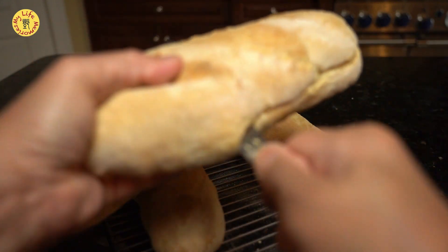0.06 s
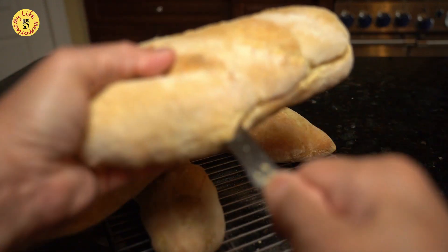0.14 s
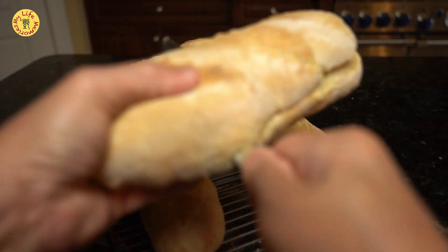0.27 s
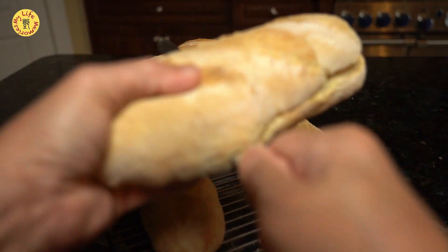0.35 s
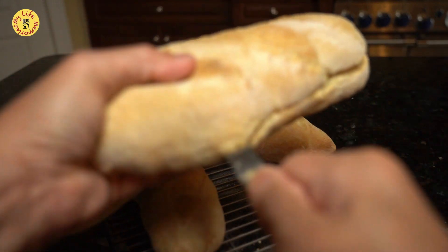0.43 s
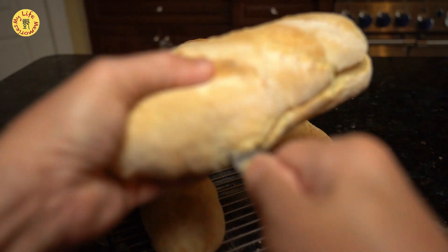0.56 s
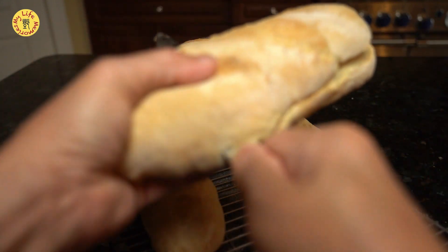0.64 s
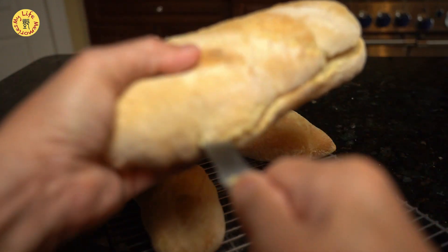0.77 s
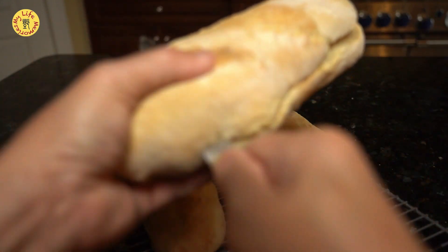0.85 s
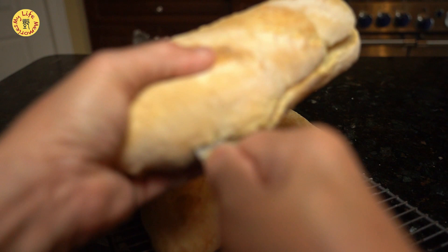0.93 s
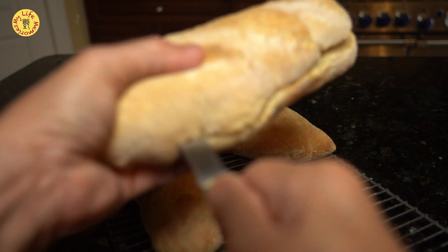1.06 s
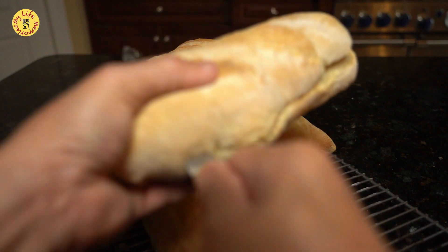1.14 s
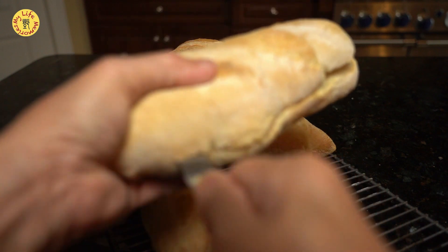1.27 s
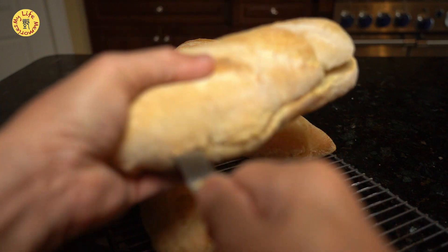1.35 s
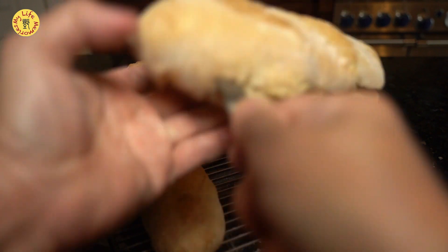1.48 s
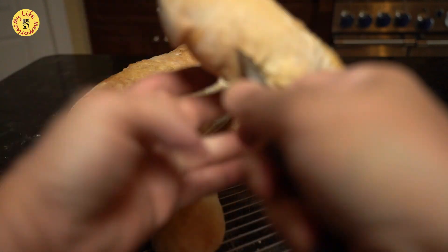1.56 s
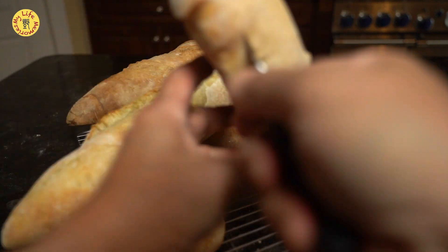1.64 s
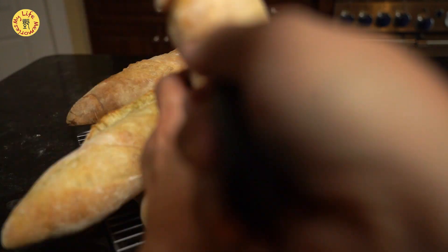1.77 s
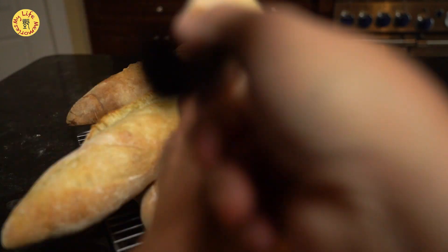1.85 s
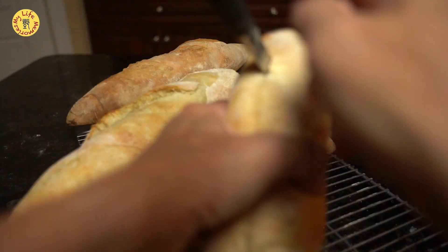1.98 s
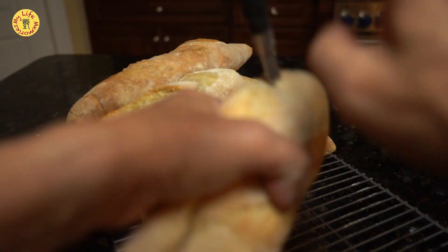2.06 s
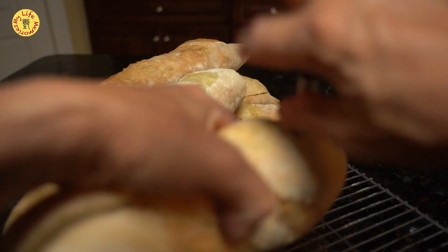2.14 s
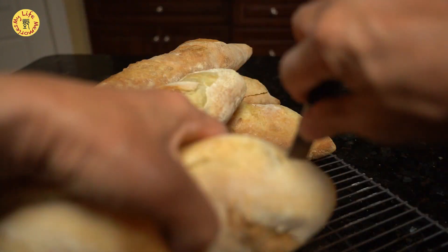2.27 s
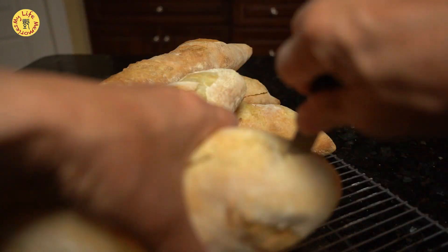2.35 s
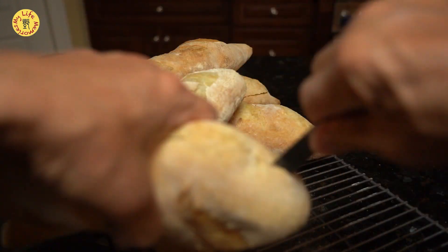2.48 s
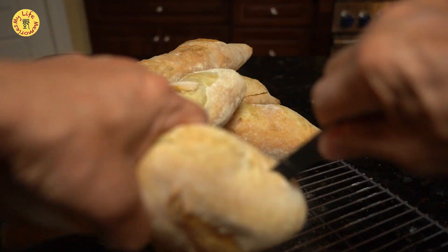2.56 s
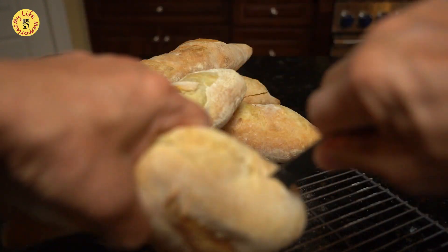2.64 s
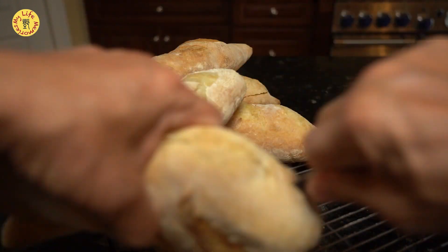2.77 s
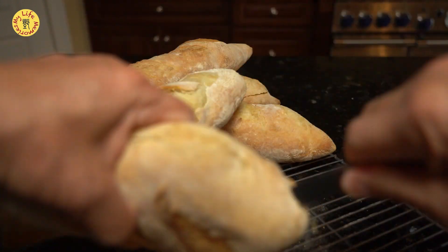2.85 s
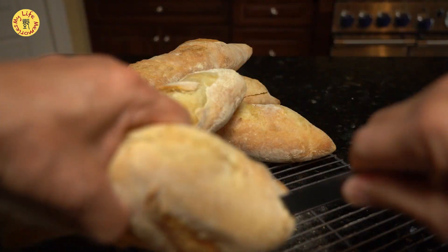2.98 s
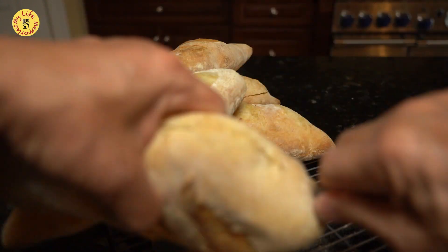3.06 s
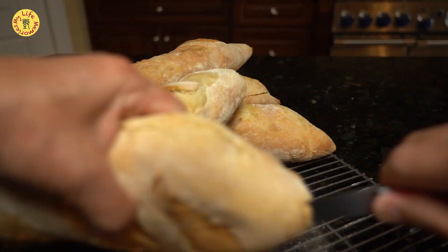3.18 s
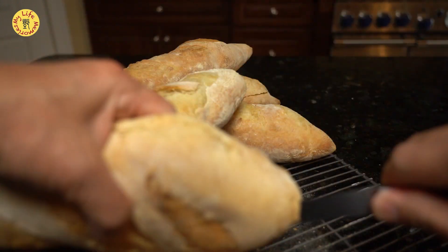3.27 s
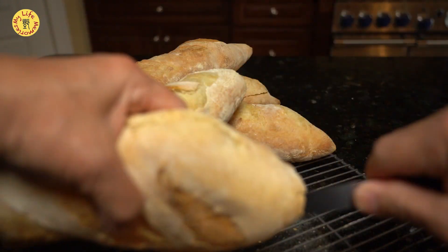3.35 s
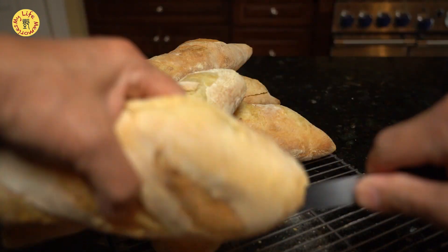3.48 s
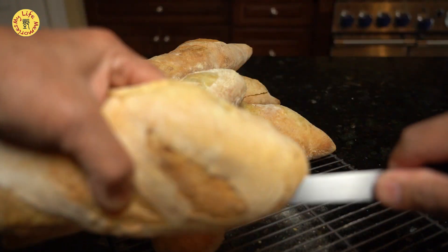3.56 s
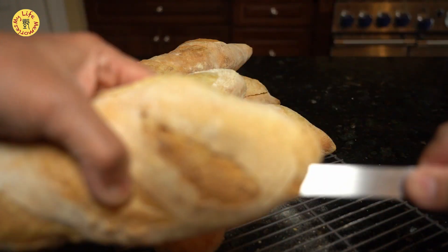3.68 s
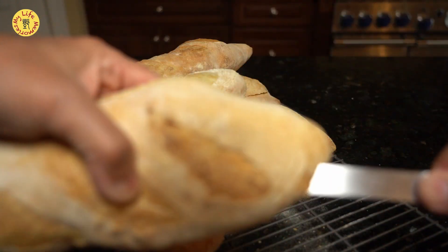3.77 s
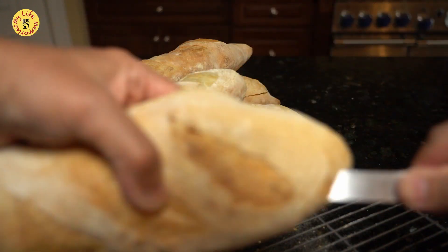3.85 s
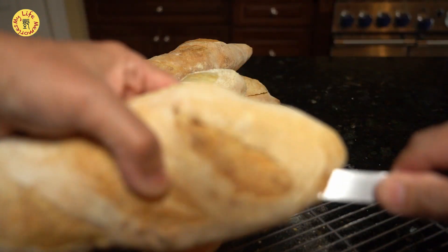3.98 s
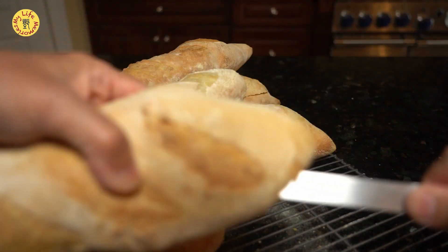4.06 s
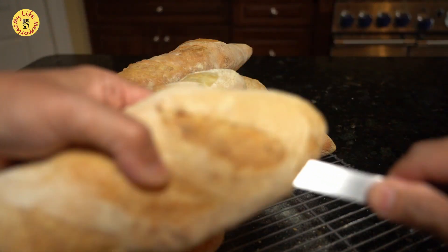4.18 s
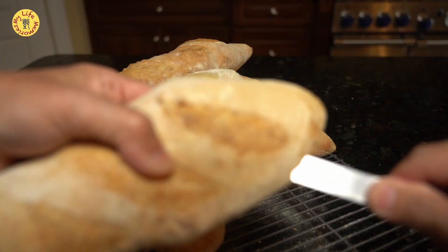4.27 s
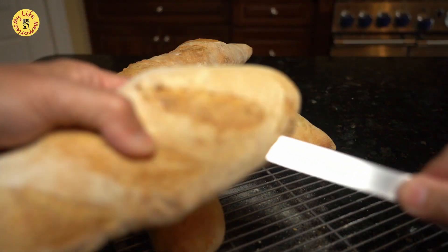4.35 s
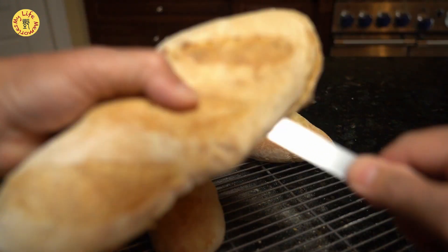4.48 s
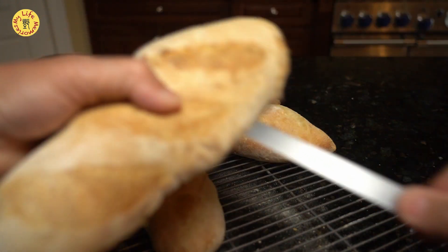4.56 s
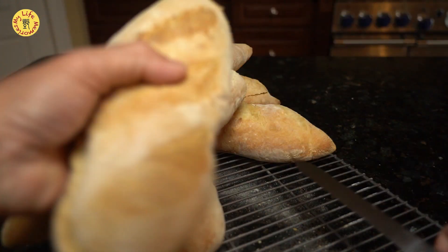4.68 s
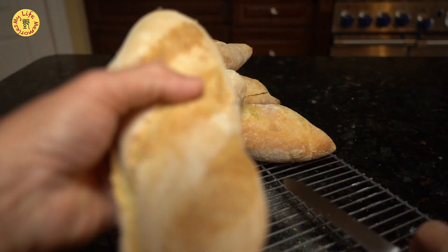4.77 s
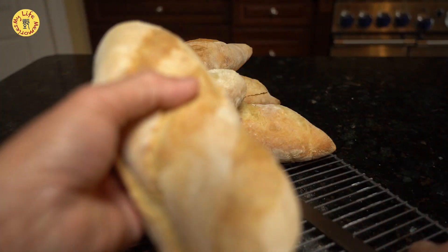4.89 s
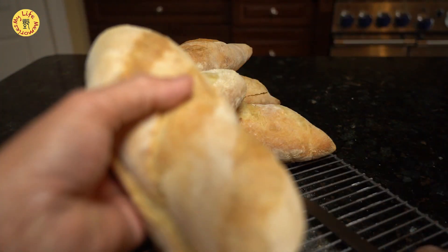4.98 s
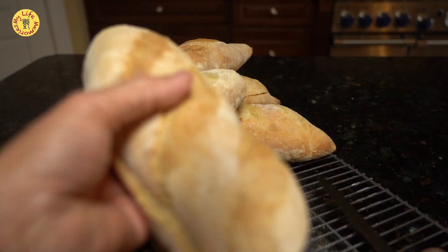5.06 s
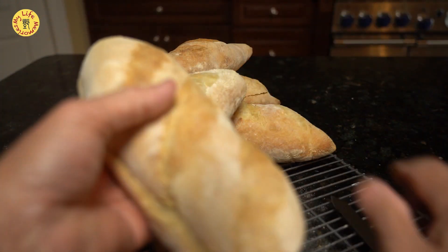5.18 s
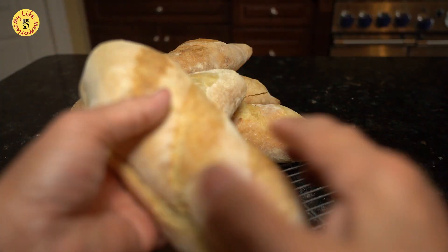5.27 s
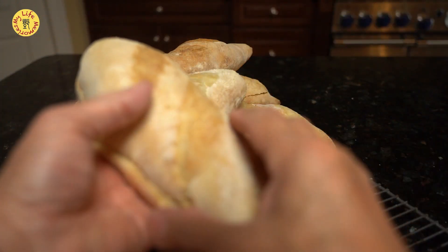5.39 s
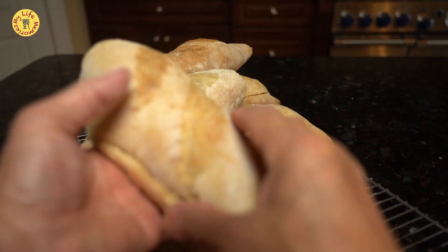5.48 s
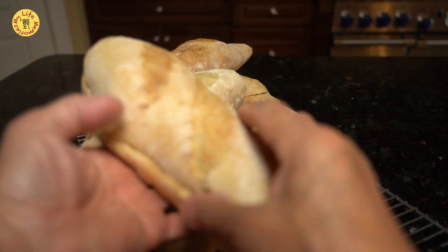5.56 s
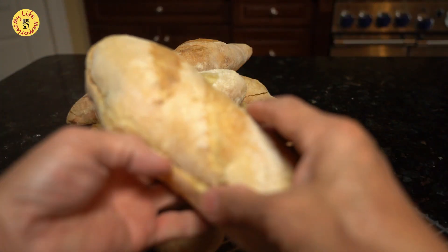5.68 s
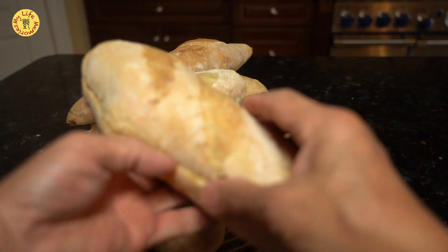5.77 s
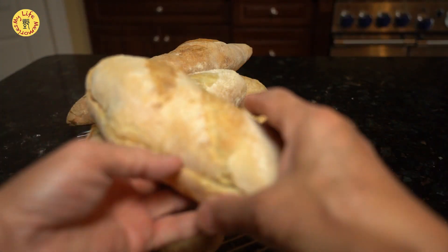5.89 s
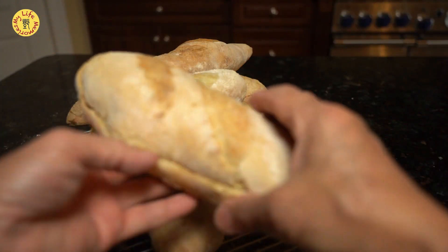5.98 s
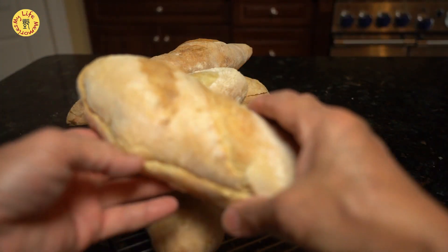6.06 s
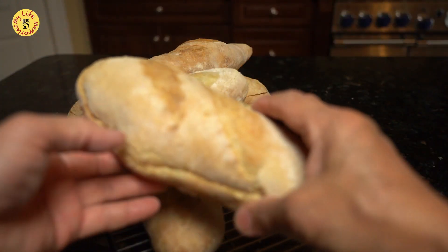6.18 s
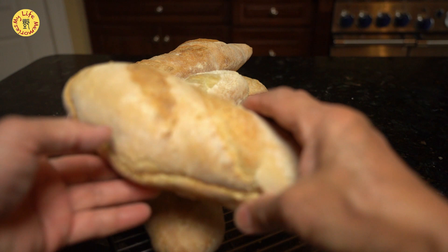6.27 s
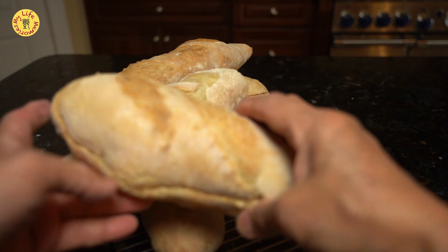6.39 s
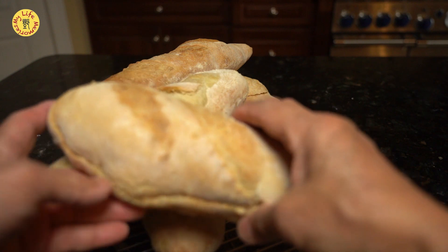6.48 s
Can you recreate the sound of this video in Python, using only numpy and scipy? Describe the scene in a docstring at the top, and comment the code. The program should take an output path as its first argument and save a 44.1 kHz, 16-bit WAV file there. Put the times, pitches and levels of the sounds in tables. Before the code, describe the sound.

A crusty loaf is cut close to a stereo pair of microphones in a quiet kitchen with short reflections. From 0 to 1.3 seconds, quick irregular sawing strokes tear the crust, with sharp dry snaps and soft hollow thuds from the loaf. Between 1.4 and 2.3 it is sparser, with a few light scrapes. From 2.4 the crackling returns, growing into dense, bright crunching from about 2.7 to 3.3. After a lull with one small snap, another short crackle comes at 4.1 to 4.5. A faint metallic touch at 4.7 leads to the knife being laid down: a light tick near 5.0, then a loud, bright, rattling clatter on the hard counter at 5.15 to 5.3. Then soft rustling, a small crusty squeeze at 6.0 and a tiny tick at 6.3. A low fan hiss and faint wavering midrange whine continue throughout.

```python
"""A knife saws through a crusty loaf between two microphones; later it is laid down with a clatter.
Strokes are clumped crackling noise; flakes snap as short noise bursts, and filtered noise gives the dull loaf.
The clatter sends noise bursts through the resonances of blade and counter; sparse taps make the reflections.
A fan hisses in the kitchen: drifting noise, narrow noise bands and two wavering tones near 1.1 kHz.
Faint low thumps are short windowed sines."""
import sys
import numpy as np
from scipy import signal
from scipy.fft import rfft, irfft
from scipy.io import wavfile
from scipy.ndimage import uniform_filter1d

SR = 44100
rng = np.random.default_rng(int(sys.argv[2]) if len(sys.argv) > 2 else 0)


def digitize_waveform(pressure):
    """Quantize a signal to 16-bit integers and store it at the path in sys.argv[1].

    Rows of a 2-D input are taken as channels; values are limited to [-1, 1].
    """
    field = np.atleast_2d(pressure).T
    bounded = np.clip(field, -1, 1)
    quanta = np.round(bounded * 32767).astype(np.int16)
    wavfile.write(sys.argv[1], SR, quanta)


N = 287956  # length in samples

# Strokes of the knife and squeezes of the hand. Each row: start in seconds, length in seconds,
# tearing level in dB before the clumping, body of the loaf over the tearing in dB.
STROKES = [(0.0, 0.034, -39, -3), (0.164, 0.033, -62.5, 11), (0.306, 0.055, -49, 2), (0.45, 0.06, -54, 8.5),
           (0.64, 0.019, -45, 3.5), (0.752, 0.052, -48.5, 2.5), (0.895, 0.033, -43, -3),
           (1.02, 0.043, -52, 6), (1.188, 0.04, -54, 10.5), (1.477, 0.034, -47.5, 1),
           (1.663, 0.12, -52, -8), (1.984, 0.063, -53, -24), (2.366, 0.016, -62, -14),
           (2.436, 0.043, -46.5, -6), (2.547, 0.025, -47, -17), (2.754, 0.11, -50, 0),
           (2.856, 0.11, -44.5, -2.5), (3.09, 0.03, -52, 8.5), (3.185, 0.079, -37.5, -4.5),
           (4.063, 0.1, -53.5, 0), (4.21, 0.077, -56.5, 11.5), (4.45, 0.014, -52.5, 11),
           (6.025, 0.054, -43, -4)]
# Flakes of crust that snap. Each row: time in seconds, crack level in dB before trim, crack pitch in Hz,
# body level against the crack in dB before trim, body pitch in Hz.
SNAPS = [(0.041, -25.5, 7670, 2.5, 1340), (0.17, -42, 4040, 18, 1760), (0.281, -31.5, 4000, 6, 2470),
         (0.31, -39, 3500, 5, 1500), (0.336, -31, 6500, 2, 1490), (0.347, -33, 4000, 4, 2000),
         (0.36, -33, 4500, -8, 2400), (0.452, -32, 3500, 8, 1830), (0.469, -36, 7040, 5, 2200),
         (0.629, -42, 4640, 11, 1290), (0.66, -37, 4000, 7, 1500), (0.681, -24, 9450, -23, 2620),
         (0.743, -31, 8520, -10, 1970), (0.776, -41.5, 4000, 15, 2050), (0.789, -40, 4000, 10, 1930),
         (0.8914, -26.5, 9310, -1.5, 1280), (0.92, -26, 6300, -3, 1670), (0.937, -30.5, 3800, 5.5, 1990),
         (1.018, -35.5, 4120, 4, 2570), (1.061, -32, 6080, -4, 1560), (1.084, -38, 5000, 14, 2020),
         (1.216, -34, 4030, 6, 1570), (1.221, -32.5, 3500, 11.5, 2750), (1.3612, -27.5, 4040, 1, 1910),
         (1.669, -34, 4820, 2, 1570), (1.994, -37, 9000, -9, 1520), (2.361, -28, 9000, -8, 3500),
         (2.3683, -23.5, 8100, -2.5, 3520), (2.377, -33, 7000, -4, 3340), (2.4166, -36, 9000, -11, 1630),
         (2.458, -34, 7000, 2, 2280), (2.472, -30, 8000, 3, 2300), (2.537, -38, 4000, 6, 1900),
         (2.5445, -28, 4000, 7.5, 900), (2.601, -35, 8500, -8, 2000), (2.7052, -21.5, 7800, -15, 1260),
         (2.7354, -21, 9300, -5, 1450), (2.772, -29.5, 4140, -5, 2500), (2.79, -37, 4000, 10, 1400),
         (2.8611, -33, 5720, 3, 2290), (2.866, -28.5, 4500, 5, 2980), (2.888, -23, 4250, -7, 3260),
         (2.904, -23.5, 8500, -6, 3300), (2.914, -27, 5960, 5, 3340), (2.92, -26, 4260, 5, 3200),
         (2.929, -33, 4260, 7, 3020), (2.943, -28, 4000, 5, 2300), (2.958, -22, 6700, -0.5, 2010),
         (2.965, -27, 4500, 3, 1100), (2.972, -28, 4970, 4, 3020), (3.1013, -35.5, 8400, 10, 1390),
         (3.1125, -30.5, 5650, 3, 1330), (3.148, -36, 4930, 11, 1270), (3.161, -26, 3300, 11, 1340),
         (3.1848, -20, 8000, -17, 1420), (3.2005, -25, 11000, -20, 1710), (3.2225, -20.5, 10500, -7, 1500),
         (3.2423, -23.5, 7200, 1, 2030), (3.254, -24, 4000, -15, 1100), (3.264, -23.5, 7000, -7, 2690),
         (3.275, -28, 4000, -4, 3160), (3.287, -28.5, 3800, 1, 1680), (3.678, -35.5, 6650, -1, 1660),
         (4.068, -32, 4340, -5, 1670), (4.1115, -23.5, 9700, -2, 1500), (4.1305, -26.5, 5000, 1, 1410),
         (4.154, -28.5, 3600, 7, 1430), (4.192, -43, 4000, 12, 1750), (4.2178, -30.5, 7150, 3, 1500),
         (4.409, -34.5, 9600, 2, 2360), (4.4473, -29, 10500, 3, 1180), (4.462, -46, 4000, 10, 1990),
         (4.4768, -32.5, 5810, 8, 3120), (4.778, -39, 9500, -8, 1900), (6.335, -31.5, 8000, -14, 1650)]
# The cut moves as the loaf is turned. Each row: time in seconds, left over right in dB.
CUT_PLACE = [(0, -3), (.65, 1), (.8, -1.5), (1.4, 3.5), (2.4, -0.5), (2.75, 1.5), (2.9, -3), (3.3, -4),
             (4.0, -0.5), (4.5, -1.5), (6.53, 4)]
# Soft bumps or squeezes of the hollow loaf. Each row: time in seconds, level in dB before trim, pitch in Hz.
BUMPS = [(0.188, -42.5, 380), (0.28, -47, 456), (0.33, -42.5, 410), (0.45, -41, 404), (0.668, -42, 930),
         (0.92, -46, 447), (1.04, -47, 890), (2.541, -44, 470), (2.623, -42, 480), (2.867, -44, 543),
         (3.087, -41, 390), (3.108, -39.5, 410), (3.161, -54, 745), (3.245, -38, 930), (4.446, -42.5, 393),
         (4.671, -42.5, 540), (6.045, -48, 460)]
# The knife touches down, lands and rattles. Each row: time in seconds, scrape level in dB before trim,
# knock against the scrape in dB before trim, knock pitch in Hz, blade ring against the scrape in dB,
# ring pitch in Hz.
CLATTER = [(4.675, -39, 0, 600, 19, 3030), (4.97, -28.5, 2, 1100, 10, 3640),
           (4.973, -22.5, 2, 1600, -3, 13400), (4.982, -33, 9, 1100, 0, 9000),
           (5.143, -13, 2, 1700, -1, 4300), (5.149, -6.5, 2.5, 1130, -16, 5800),
           (5.157, -12.5, 1, 1300, -5, 9560), (5.1633, -11.5, 7, 1000, -9, 5700),
           (5.171, -14, 11, 1200, -11, 9570), (5.1766, -19, 9, 1300, 0, 7400),
           (5.187, -23, 13, 950, 10, 3050), (5.1967, -9, -4, 1300, -4, 4900),
           (5.2024, -7, 2, 800, -1, 3020), (5.2157, -12.5, 7, 2030, 0.5, 6800),
           (5.222, -12.5, 6, 430, -14, 5700), (5.2276, -18.5, 12.5, 1180, -18, 8370),
           (5.2382, -19, 4, 1450, -2, 7470), (5.2601, -19, 6, 1100, -9, 7040),
           (5.283, -24.5, 5, 1100, -9, 7400), (5.313, -34, 16, 1300, -5, 7450)]
# Tone colour of the tearing crust. Each row: frequency in Hz, relative level in dB per Hz.
CRUST = [(1470, -22), (2500, -5), (3230, -5.5), (3550, -4), (4410, -9), (5030, -9), (5610, -7), (15200, -9),
         (16000, -4.5)]
# Tone colour of the loaf's body. Each row: frequency in Hz, relative level in dB per Hz.
LOAF = [(88, -60), (150, -26), (300, -20), (579, -8), (660, -11.5), (1200, -4.5), (1320, -4.5),
        (1570, -4.5), (3220, -10), (5000, -18), (6500, -94), (11000, -120)]
# Tone colour of the scraping blade. Each row: frequency in Hz, relative level in dB per Hz.
BLADE = [(1470, -26), (2000, 8), (2500, -6), (2740, -11), (2990, 2), (3720, -5), (5740, 1), (6200, -1),
         (8600, -5), (10100, -9.5), (15000, -8), (16000, -9)]
# Ringing modes of the blade. Each row: frequency in Hz, width in Hz, relative level in dB.
STEEL = [(3042, 50, 2), (3800, 90, -4), (4230, 90, -4), (5000, 90, -5), (5647, 70, -4), (5792, 70, -4),
         (5954, 110, -7), (6756, 130, -6), (7456, 130, -6), (7698, 120, -7), (8333, 130, -6),
         (8635, 70, -4), (9577, 80, -2), (11413, 90, -7), (13431, 80, -5), (15321, 110, -10)]
# Ringing modes of the counter top. Each row: frequency in Hz, width in Hz, relative level in dB.
COUNTER = [(330, 60, -13), (425, 60, -6), (620, 90, -14), (813, 60, -4), (880, 70, -7), (980, 70, -5),
           (1068, 35, 2), (1185, 70, -6), (1270, 50, -3), (1357, 55, -5), (1486, 45, -4), (1610, 40, -4),
           (2056, 60, -4), (2358, 70, -7)]
# Decay of the kitchen's reflections. Each row: frequency in Hz, time to fall 60 dB in seconds.
KITCHEN = [(300, 0.18), (1200, 0.34), (5000, 0.28), (14000, 0.096)]
# The two strongest fan tones swell and fade. Each row: time in seconds, then lower and upper tone
# levels in dB before trim.
WHINE = [(0.0, -60, -51), (.15, -52.5, -65), (.41, -49.5, -50.5), (.47, -76, -74), (.64, -59, -68),
         (.7, -60, -63), (.9, -59, -56), (1.0, -50, -66), (1.1, -64, -63), (1.2, -54.5, -53.5),
         (1.45, -53.5, -60), (1.53, -70, -64), (1.63, -49.5, -55), (1.82, -50.5, -65), (1.9, -72, -62),
         (1.97, -56, -53), (2.3, -56, -60), (2.38, -49, -62), (2.5, -69, -46), (2.62, -54, -63),
         (2.72, -53, -57), (2.8, -68, -59), (2.97, -47, -51), (3.08, -59, -64), (3.2, -49, -60),
         (3.3, -56, -64), (3.4, -49.5, -73), (3.57, -68, -66), (3.65, -56, -49.5), (3.75, -62, -75),
         (3.85, -53.5, -66), (4.05, -54, -68), (4.16, -60, -58), (4.33, -56.5, -56), (4.5, -64.5, -56),
         (4.56, -52.5, -59), (4.75, -55, -63), (4.9, -63, -56), (5.02, -50, -54), (5.36, -64, -56),
         (5.46, -53.5, -58), (5.9, -58, -52.5), (6.0, -53, -56.5), (6.36, -55, -56.5), (6.46, -65, -67),
         (6.53, -49, -54)]
# Centre pitches of the lower and upper fan tone. The columns are two frequencies in Hz.
WHINE_HZ = (1093, 1138)
# Tone colour of the fan's hiss. Each row: frequency in Hz, relative level in dB per Hz.
HISS = [(20, -54), (60, -40.5), (188, -13), (240, -20), (290, -7.5), (700, -11), (1100, -6), (1900, -7),
        (4200, -14), (4900, -18), (7700, -18.5), (8500, -25), (12400, -26), (15000, -29.5), (16200, -39)]
# Fainter fan tones. Each row: frequency in Hz, width of one filter pass in Hz, level in dB.
FAN_TONES = [(512.6, 19.5, -60.5), (1401, 28, -64), (1663, 32, -56), (1966, 30, -57.5), (12900, 200, -84)]
# Rise and fall of the room's bass within the hiss. Each row: time in seconds, relative level in dB.
RUMBLE = [(0, -2), (.5, 0), (.78, 8), (.86, -15), (.95, -0.5), (1.3, -5.5), (2.17, 0), (2.21, -18),
          (2.33, -11), (2.37, -1.5), (3.2, -3), (3.5, -3), (4.7, -3), (6.53, -4)]
# Faint low thumps as the hands shift. Each row: time in seconds, level in dB before trim, pitch in Hz.
THUMPS = [(0.18, -60, 40), (0.224, -53, 110), (1.09, -55, 75), (1.175, -61, 50), (1.55, -64, 80),
          (4.72, -66, 60)]
# Balance of the two microphones. Each row: frequency in Hz, left over right in dB.
MIC_BALANCE = [(60, -2), (180, 1.5), (550, -1.5), (1650, -3), (4970, -5), (15000, -3)]

BITE_DB_PER_S, LET_GO_DB_PER_S = 524, 301  # how fast a stroke sets in and dies away
RUSTLE_DB, RUSTLE_BODY_DB = -58.5, 2.5  # the loaf rustles in the hands between strokes; body over the tearing
SNAP_T60_S, SNAP_HZ, SMALLER = 0.046, 5040, 0.62  # t60 at SNAP_HZ; higher flakes are shorter by a power law
KNOCK_T60_S, KNOCK_WIDTH_HZ = 0.02, 230  # a flake's knock on the loaf
BUMP_T60_S, TOUCH_T60_S, BLOW_T60_S = 0.14, 0.063, 0.03  # loaf bumps, blade touches, counter blows
BURST_SAMPLES, LEAD_S = 6000, 0.01  # length of a burst; its swell before the peak
HISS_DB = -41.5
RUMBLE_HZ, RUMBLE_FLICKER_DB = 402, 4  # the bass changes fade out above this pitch
EDGE_HZ = 15840


def sawing():
    """Tearing crust comes in clumps a few milliseconds long, which also shake the loaf."""
    start, length, tear_db, body_db = np.transpose(STROKES)[:, :, None]
    t = np.arange(0, N, 16) / SR
    before = np.maximum(start - t, 0)
    after = np.maximum(t - start - length, 0)
    shape_db = -BITE_DB_PER_S * before - LET_GO_DB_PER_S * after
    tearing = gain_of(RUSTLE_DB) + gain_of(tear_db + shape_db).sum(0)
    shaking = gain_of(RUSTLE_DB + RUSTLE_BODY_DB) + gain_of(tear_db + body_db + shape_db).sum(0)
    clumps = evened(smoothed_twice(rng.standard_normal(N), 120))
    tear = colour(cracks(N, spread_db=4), lambda f: gain_of(read(CRUST, f)))
    body = colour(cracks(N, spread_db=2.0), lambda f: gain_of(read(LOAF, f)))
    sound = tearing.repeat(16)[:N] * tear
    sound += shaking.repeat(16)[:N] * mottled(body, patchy_db=3.5)
    return gain_of(2.05 * clumps) * sound


def mottled(x, patchy_db):
    """The loaf's dull noise shifts colour in random patches some 15 ms long and 1.5 kHz wide."""
    z = signal.stft(x, nperseg=256, noverlap=192)[2]
    patches = uniform_filter1d(rng.standard_normal(z.shape[1:]), size=8, axis=0)
    patches = evened(uniform_filter1d(patches, size=10, axis=1))
    varied = signal.istft(z * gain_of(patchy_db * patches), nperseg=256, noverlap=192)[1]
    return evened(varied[:, :x.shape[1]])


def snaps():
    """Each flake breaks in a bright puff around its own pitch, knocks the loaf and faintly rings the blade."""
    out = np.zeros((2, N))
    for s, db, crack_hz, body_db, body_hz in SNAPS:
        def crack_gain(f):
            broad = 0.48 / (1 + (f / (4.5 * crack_hz)) ** 4)
            puff = abs(peak(f, crack_hz, 0.4 * crack_hz))
            return gain_of(read(CRUST, f)) * (broad + puff)

        def body_gain(f):
            resonance = 0.29 + peak(f, body_hz, KNOCK_WIDTH_HZ)
            return gain_of(read(LOAF, f)) * resonance * [[1], [1j]]  # a quarter cycle apart

        crack = colour(cracks(BURST_SAMPLES, spread_db=3.5), crack_gain)
        both, apart = cracks(BURST_SAMPLES, spread_db=1.5) * burst(KNOCK_T60_S, rise=0.016)
        knock = np.array([both + 0.5 * apart, both - 0.5 * apart])
        body = colour(knock, body_gain)
        t60 = SNAP_T60_S * (SNAP_HZ / crack_hz) ** SMALLER
        sound = crack * burst(t60, rise=0.73 * t60)
        sound += gain_of(body_db + 6.0) * body / abs(body).max()
        pan_db = np.interp(s, *np.transpose(CUT_PLACE)) * np.array([[0.5], [-0.5]])
        add(out, s + 0.002 - LEAD_S, gain_of(db - 7.0 + pan_db) * sound)
    return out + gain_of(-30.0) * ring(out, STEEL)


def bumps():
    """A soft push excites the air inside the loaf: a dull, short thud."""
    out = np.zeros((2, N))
    for s, db, hz in BUMPS:
        left, other = rng.standard_normal((2, BURST_SAMPLES))
        noise = np.array([left, 0.5 * left + 0.8 * other])  # partly shared by the microphones
        air = colour(noise, lambda f: peak(f, hz, 280) ** 2 * np.minimum(f / hz, 1) ** 2)
        add(out, s + 0.00405 - LEAD_S, gain_of(db - 1.5) * air * burst(BUMP_T60_S, rise=0.049))
    return out


def knife():
    """Each touch scrapes and rings the blade and knocks the counter's low modes."""
    scrape, taps, blows = np.zeros((3, 2, N))
    for s, db, body_db, body_hz, ring_db, ring_hz in CLATTER:
        shape = gain_of(db - 15.0) * burst(TOUCH_T60_S, rise=0.028)
        grit = cracks(BURST_SAMPLES, spread_db=4)
        knock = cracks(BURST_SAMPLES, spread_db=4)
        start = s + 0.0025 - LEAD_S
        add(scrape, start, shape * colour(grit, lambda f: gain_of(read(BLADE, f))))
        # the point of contact favours the modes near one pitch
        touch = colour(grit, lambda f: 0.12 + abs(peak(f, ring_hz, 1200)))
        add(taps, start, gain_of(ring_db) * shape * touch)
        thud = colour(knock, lambda f: 0.15 + abs(peak(f, body_hz, 500)))
        add(blows, start, gain_of(db + body_db - 26) * burst(BLOW_T60_S, rise=0.036) * thud)
    return scrape + ring(taps, STEEL) + gain_of(1.5) * ring(blows, COUNTER)


def ring(x, modes):
    """Passes blows through a set of resonant modes, rolling off below the lowest."""
    f = np.fft.rfftfreq(x.shape[-1], 1 / SR)
    response = sum(gain_of(db) * peak(f, hz, width) for hz, width, db in modes)
    response *= (1j * f / (1j * f + modes[0][0])) ** 3
    response /= np.sqrt(np.mean(abs(response) ** 2))
    return irfft(rfft(x) * response, x.shape[-1])


def kitchen(x):
    """Reflections as sparse taps of random sign, other ones for each side, each band dying at its own speed."""
    taps = np.zeros((2, SR // 2))
    at = np.arange(200, SR // 2 - 20, 20)
    at = at + rng.integers(0, 20, (2, len(at)))
    np.put_along_axis(taps, at, rng.choice([-1., 1.], at.shape), 1)
    hz, t, z = signal.stft(taps, SR, nperseg=256)
    decay = gain_of(-60 * t / read(KITCHEN, hz)[:, None])
    tail = signal.istft(z * decay, SR, nperseg=256)[1]
    return signal.fftconvolve(x, tail / np.linalg.norm(tail[0]), axes=1)[:, :N]


def whine():
    """Two fan tones whose pitch wavers; phase and strength differ at each microphone."""
    s, *levels = np.transpose(WHINE)
    out = np.zeros((2, N))
    for hz, level_db in zip(WHINE_HZ, levels):
        wavering_hz = hz + 8.5 * drift(count=1)
        turns = np.cumsum(wavering_hz, 1) / SR + [[0], [1 / 4]] + 0.04 * drift(count=2)
        swell_db = np.interp(np.arange(N) / SR, s, level_db) + 9.0 + 3.1 * drift(count=2)
        out += gain_of(swell_db) * np.sin(2 * np.pi * turns)
    return out


def drift(count):
    """Slow random curves of rms 1: noise averaged twice over about 20 ms."""
    return evened(smoothed_twice(rng.standard_normal((count, N)), 900))


def fan():
    """Smooth hiss with drifting patches; narrow noise bands make the fainter wavering tones."""
    frames, hz = N // 256 + 5, np.fft.rfftfreq(1024, 1 / SR)
    real, imaginary = rng.standard_normal((2, 2, 513, frames))
    patches = uniform_filter1d(rng.standard_normal((513, frames)), size=14, axis=0)
    patches = evened(uniform_filter1d(patches, size=12, axis=1))
    flicker = evened(uniform_filter1d(rng.standard_normal(frames), size=14))
    bass_db = np.interp(np.arange(frames) * 256 / SR, *np.transpose(RUMBLE))
    bass_db = bass_db + RUMBLE_FLICKER_DB * flicker
    low = 1 / (1 + (hz[:, None] / RUMBLE_HZ) ** 4)
    level_db = read(HISS, hz)[:, None] + 1.3 * patches + low * bass_db
    z = (real + 1j * imaginary) * gain_of(level_db)
    hiss = signal.istft(z, nperseg=1024, noverlap=768)[1][:, :N]
    out = gain_of(HISS_DB) * evened(hiss)
    for tone_hz, width, db in FAN_TONES:
        left, other = rng.standard_normal((2, N))
        air = np.array([left, 0.39 * left + 1.44 * other])  # partly shared, stronger on the right
        out += gain_of(db) * colour(air, lambda f: peak(f, tone_hz, width) ** 2)
    return out


def thumps():
    """One soft push and rebound of air, a quarter cycle apart at the two microphones."""
    out = np.zeros((2, N))
    for s, db, hz in THUMPS:
        turn = 2 * np.pi * hz * np.arange(round(1.5 * SR / hz)) / SR  # one and a half cycles
        push = np.array([np.sin(turn), np.cos(turn)]) * np.sin(turn / 3) ** 2
        add(out, s - 0.94 / hz, gain_of(db + 7.0) * push)
    return out


def cracks(size, spread_db):
    """Two unrelated sprays of tiny cracks of uneven size, one for each microphone."""
    crack_gain = gain_of(spread_db * rng.standard_normal((2, size // 16 + 1)))
    return rng.standard_normal((2, size)) * crack_gain.repeat(16, 1)[:, :size]


def burst(t60, rise):
    """Envelope of a short burst: a quick swell to a sharp peak at 10 ms, then a decay; both are times for 60 dB."""
    t = np.arange(BURST_SAMPLES) / SR - LEAD_S
    return gain_of(-60 * np.where(t < 0, -t / rise, t / t60))


def peak(f, hz, width):
    """Complex response of one resonance, gain 1 at its centre."""
    return 1 / (1 + 2j * (f - hz) / width)


def colour(x, gain):
    """Filters by a gain given as a function of frequency, then scales to rms 1."""
    size = x.shape[-1]
    return evened(irfft(rfft(x) * gain(np.fft.rfftfreq(size, 1 / SR)), size))


def read(points, hz):
    """Reads a table on a log-frequency axis."""
    f, value = np.transpose(points)
    return np.interp(np.log(hz + 1), np.log(f + 1), value)


def smoothed_twice(x, size):
    """Runs a moving average over x twice."""
    return uniform_filter1d(uniform_filter1d(x, size=size), size=size)


def evened(x):
    """Scales to rms 1."""
    return x / np.sqrt(np.mean(x ** 2) + 1e-20)


def gain_of(db):
    """Decibels to gain."""
    return 10 ** (np.asarray(db) / 20)


def add(mix, s, sound):
    """Mixes a sound in at s seconds."""
    part = mix[:, max(round(s * SR), 0):][:, :sound.shape[1]]
    part += sound[:, :part.shape[1]]


def scene():
    """Bread and knife, their reflections, the fan and the thumps."""
    near = sawing() + snaps() + bumps() + knife()
    return near + gain_of(-10.5) * kitchen(near) + whine() + fan() + thumps()


def record(dry):
    """Weak in the bass; the right microphone is the more sensitive in the treble; then the band limit."""
    f = np.fft.rfftfreq(N, 1 / SR)
    balance_db = read(MIC_BALANCE, f) * np.array([[0.5], [-0.5]])
    bass_cut = (1j * f / (1j * f + 60)) ** 2
    heard = gain_of(0.5) * irfft(rfft(dry) * gain_of(balance_db) * bass_cut, N)
    band_limit = signal.firwin(1023, EDGE_HZ, window=("kaiser", 9), fs=SR)
    return signal.oaconvolve(heard, band_limit[None], "same")


dry = scene()
out = record(dry)
digitize_waveform(out)
```